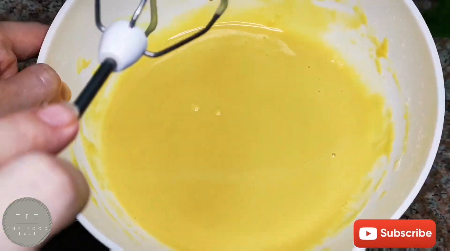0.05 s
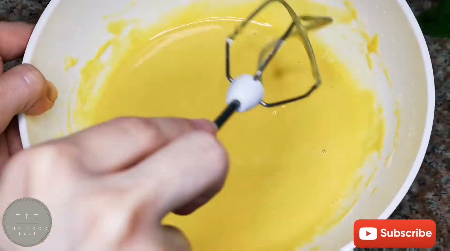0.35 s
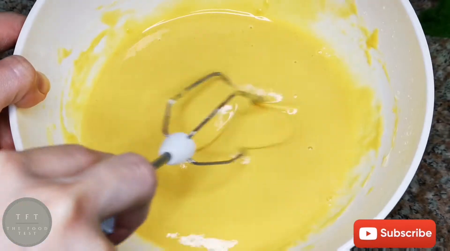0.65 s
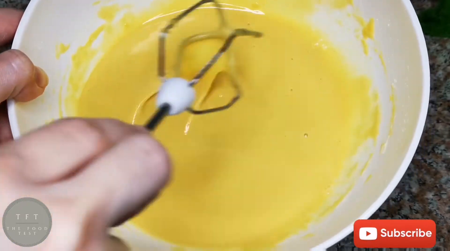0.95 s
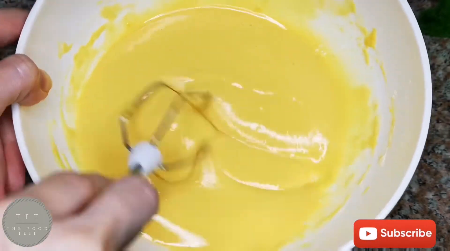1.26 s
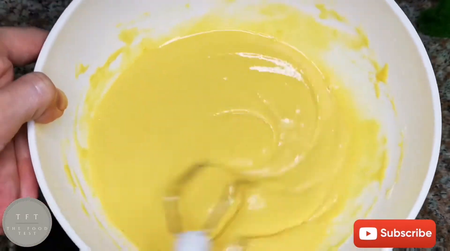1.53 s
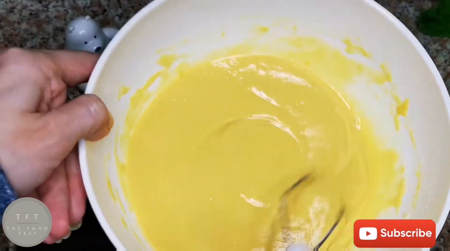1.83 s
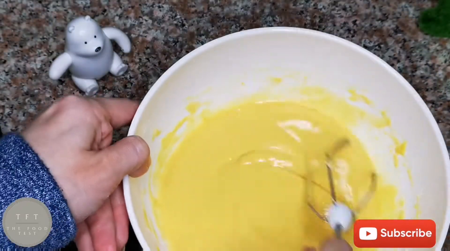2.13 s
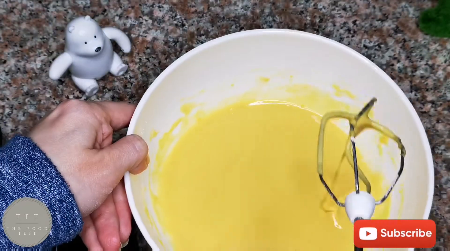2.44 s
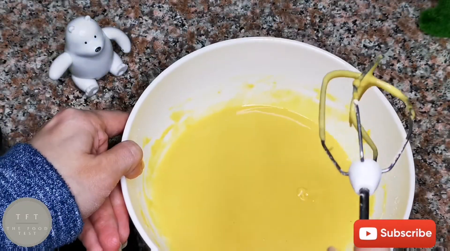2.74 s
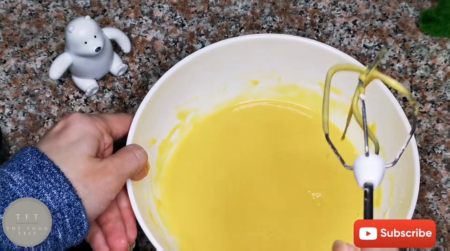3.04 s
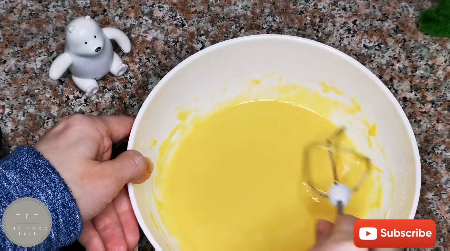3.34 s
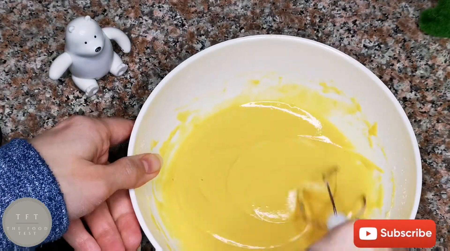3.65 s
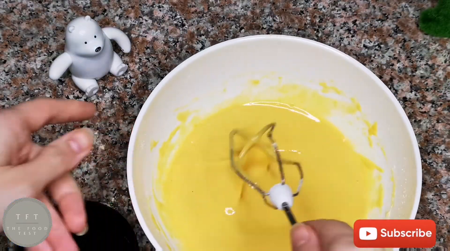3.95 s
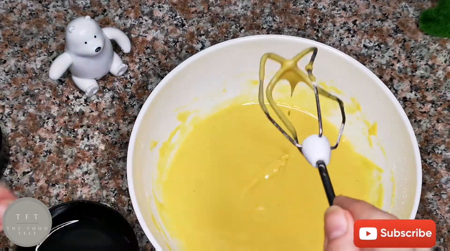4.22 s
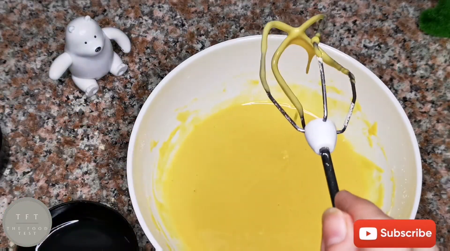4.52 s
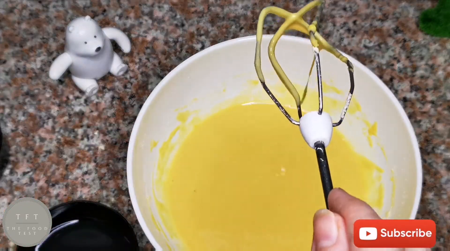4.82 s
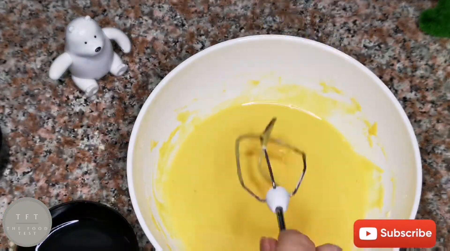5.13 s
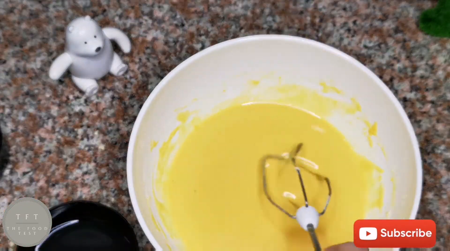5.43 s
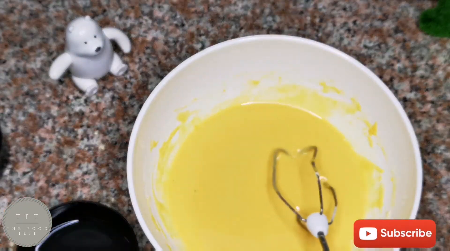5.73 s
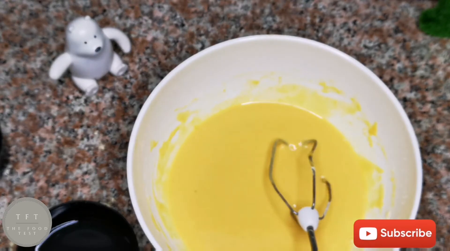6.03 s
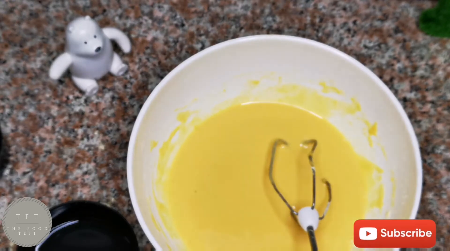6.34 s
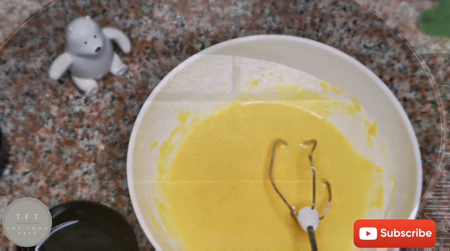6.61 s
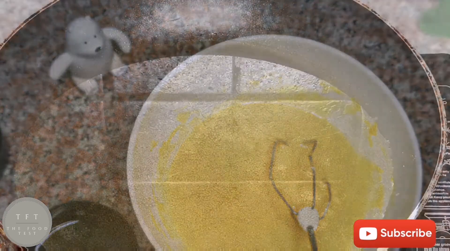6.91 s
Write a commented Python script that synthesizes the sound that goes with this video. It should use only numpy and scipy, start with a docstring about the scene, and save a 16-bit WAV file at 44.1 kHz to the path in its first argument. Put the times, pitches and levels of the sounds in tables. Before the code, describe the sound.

A wire whisk ticks and scrapes in a bowl of batter, with a clatter of dull knocks and two clinks over kitchen hum.

```python
"""Whisking batter in a ceramic bowl

A wire whisk stirs thick batter, close by in a small, humming kitchen. The batter is almost
silent: the wires tick and scrape on the bowl, a few dull knocks clatter, and the whisk clinks
twice as it is laid against the rim. Near the end all sound drops out briefly."""
import sys
import numpy as np
from scipy import signal
from scipy.fft import rfft, irfft, next_fast_len
from scipy.io import wavfile
from scipy.ndimage import uniform_filter1d

SR = 44100
rng = np.random.default_rng(int(sys.argv[2]) if len(sys.argv) > 2 else 0)


def dump_mix(stems):
    """Bounce the given channels to the path in sys.argv[1] as a 16-bit WAV at rate SR."""
    frames = np.atleast_2d(stems).T  # one column per channel
    limited = np.clip(frames, -1, 1)  # hard clip at full scale
    pcm = np.round(limited * 32767).astype(np.int16)
    wavfile.write(sys.argv[1], SR, pcm)


N = 311768
TIME_S = np.arange(N) / SR
AGE_S = TIME_S[:SR // 2]  # time since a blow
TOP_HZ = 15000


def undb(db):
    """Decibels to gain."""
    return 10 ** (np.asarray(db) / 20)


def unit(x):
    """Scale to rms 1."""
    return x / np.sqrt(np.mean(x ** 2))


def add(out, start_s, x):
    """Mix x into out."""
    i = int(start_s * SR)
    out[i:i + len(x)] += x[:N - i]


def colour(x, points):
    """Minimum-phase filter, unit power gain; points: freq_hz, gain_db."""
    size = 2 * next_fast_len(len(x))
    hz, db = np.transpose(points)
    bins_hz = np.fft.rfftfreq(size, 1 / SR)
    gain = unit(undb(np.interp(np.log(bins_hz + 1), np.log(hz), db)))
    cepstrum = irfft(np.log(gain))
    cepstrum[1:size // 2] *= 2
    cepstrum[size // 2 + 1:] = 0
    return irfft(rfft(x, size) * np.exp(rfft(cepstrum)))[:len(x)]


def band(hz, width_hz):
    """Noise passed twice through one resonance, rms 1."""
    b, a = signal.iirpeak(hz, hz / width_hz, fs=SR)
    return unit(signal.lfilter(b, a, signal.lfilter(b, a, rng.standard_normal(N))))


def fade(t60_s):
    """Free decay after a blow."""
    return np.exp(-np.log(1000) * AGE_S / t60_s)


def onset(rise_s):
    """Smooth rise from 0 to 1."""
    return 1 - np.exp(-(AGE_S / rise_s) ** 2)


def ring(modes):
    """Modes struck together: freq_hz, level_db, t60_s."""
    return sum(undb(db) * fade(t60_s) * np.sin(2 * np.pi * hz * AGE_S) for hz, db, t60_s in modes)


def swell(hz, rise_s):
    """Heavily damped resonance: builds for a few cycles, dies as fast."""
    u = AGE_S / rise_s
    return (u * np.exp(1 - u)) ** 6 * np.cos(2 * np.pi * hz * (AGE_S - rise_s))


def burst(points, t60_s, rise_s):
    """Crack of a contact that takes a moment to close; points: freq_hz, gain_db."""
    return colour(rng.standard_normal(len(AGE_S)) * fade(t60_s) * onset(rise_s), points)


def wander(rate_hz):
    """Random line, rate_hz new values a second."""
    return np.interp(AGE_S * rate_hz, np.arange(len(AGE_S)), rng.standard_normal(len(AGE_S)))


def kitchen(x, wet_db, t60_s, rise_s):
    """Direct sound plus dense reflections off tiles and cupboards."""
    spectrum = rfft(rng.standard_normal(len(AGE_S)))
    tail = irfft(spectrum / np.abs(spectrum), len(AGE_S)) * fade(t60_s) * onset(rise_s)
    return x + undb(wet_db) * signal.fftconvolve(x, tail / np.linalg.norm(tail))[:N]


def room_tone():
    """Ventilation rumble and faint whine at the room's resonances, a steady hum line near 959 Hz, plus thin
    hiss."""
    # air spectrum: freq_hz, density_db
    air_colour = [(20, -5), (60, -5.5), (140, -4.5), (185, -10), (260, -5.5), (410, -12), (510, -14.5),
                  (700, -14.5), (1100, -16.5), (1500, -21), (2900, -29), (4200, -43), (7500, -39.5),
                  (9400, -66.5), (15000, -72)]
    # rumble envelope: time_s, level_db
    air_levels = [(0, -57), (2.8, -56.5), (3.3, -54), (5.6, -55), (6.4, -52.5), (6.9, -56)]
    # room resonances and a hum line near 959 Hz: freq_hz, width_hz, level_db re air
    drone_lines = [(44.6, 14, -6), (70.6, 7.2, -8.5), (102.7, 12, -5), (139.9, 35, -11.5),
                   (212.8, 8.1, -12.5), (793.7, 27, -17.5), (959, 11, -18)]
    air = unit(colour(rng.standard_normal(N), air_colour))
    drone = sum(undb(db) * band(hz, width_hz) for hz, width_hz, db in drone_lines)
    hiss = colour(rng.standard_normal(N), [(3000, -6), (5500, -15.5), (6800, -9.5), (7800, 0),
                                           (8300, -15.5), (9500, -24), (15000, -37)])
    level_db = np.interp(TIME_S, *np.transpose(air_levels))
    return undb(level_db) * (air + drone) + undb(-77) * hiss


def ticks():
    """Wires touch the bowl, damped by batter: a crack, a brief ring, a soft thud."""
    # wire contacts: start_s, level_db, wire_hz, wire_db, thud_hz, thud_db, tilt_db_per_octave
    touches = [(.6324, -47, 2840, 3.5, 810, 0, -4), (.8355, -63, 9900, -10, 800, -12, 4),
               (1.2570, -29, 5850, -11, 578, -9.5, 3), (1.4310, -60, 2820, 8, 600, -6, 0),
               (1.5130, -57.5, 3920, 0, 600, -9, -3), (1.7135, -56.5, 2300, 4, 680, 6, -4),
               (2.0865, -54, 3880, -5, 824, 5, -3), (3.4730, -40, 5500, -1, 1028, 2.5, -1),
               (3.5308, -47.5, 5950, -1, 598, 0, -1), (3.5842, -49, 5570, 7, 600, -14, -1),
               (3.7730, -41, 8700, -0.5, 635, -7, -4.5), (3.9107, -43, 5680, -6, 610, -10, 2)]
    # contact spectrum: freq_hz, gain_db
    crack_colour = [(400, -10), (1500, -14.5), (2800, -10.5), (3500, -14), (4200, -5.5), (5000, -8.5),
                    (5650, 4), (6400, -6), (7700, 1.5), (8700, -3.5), (9400, -14), (11400, -20),
                    (12200, -35), (15000, -37)]
    wires, bowl = np.zeros(N), np.zeros(N)
    for start_s, db, wire_hz, wire_db, thud_hz, thud_db, tilt in touches:
        tilted = [(hz, gain_db + tilt * np.log2(hz / TOP_HZ)) for hz, gain_db in crack_colour]
        crack = burst(tilted, t60_s=.016, rise_s=.0012)
        wire = ring([(wire_hz, wire_db, .014)]) * (1 - fade(.0014))
        thud = ring([(thud_hz, 0, .04), (thud_hz * 1.183, -6, .03)]) * (1 - fade(.0037))
        add(wires, start_s, undb(db) * (crack + wire))
        add(bowl, start_s, undb(db + thud_db) * thud)
    return (kitchen(wires, wet_db=-5.5, t60_s=.23, rise_s=.0032)
            + kitchen(bowl, wet_db=.5, t60_s=.2, rise_s=.0044))


def squelches(bubbles=7, spread_s=.033):
    """Batter sucks shut behind the wires: clusters of tiny bubbles that glide upward."""
    # air pockets: start_s, level_db, cavity_hz
    pockets = [(.812, -68, 2770), (1.405, -68, 3600), (1.420, -64.5, 2700), (1.490, -66.5, 3750),
               (1.785, -74, 4200), (3.774, -62.5, 4120)]
    glide_s = AGE_S + .057 * AGE_S ** 2 / (AGE_S + .0089)  # pitch rises toward +5.7 %
    out = np.zeros(N)
    for start_s, db, cavity_hz in pockets:
        for late, detune, size in rng.random((bubbles, 3)):
            hz = cavity_hz * (1 + .11 * (detune - .5))
            bubble = fade(.022) * np.sin(2 * np.pi * hz * glide_s)
            add(out, start_s + spread_s * late, undb(db + 5.4 * size) * bubble)
    return kitchen(out, wet_db=-6, t60_s=.16, rise_s=.0076)


def stroke(peak_s, build_s, release_s=.08, range_db=20):
    """Gain of one stroke: drag gains range_db over the build-up, loses it over the release."""
    return undb(-range_db * np.maximum((peak_s - TIME_S) / build_s, (TIME_S - peak_s) / release_s))


def stirring(cling_points=400, slips_per_s=3000):
    """Wire slips and wet crackles bunch as the batter clings; stick-slip on the glaze squeaks."""
    # whisk strokes: peak_s, level_db, build_s, squeak_db
    strokes = [(.85, -87, .3, -20), (1.43, -80, .25, -20), (1.70, -75, .09, -20), (1.81, -81, .1, -20),
               (1.97, -79, .3, -20), (3.588, -66, 0.07, 2.5), (3.91, -69, 0.24, -11)]
    cling_times_s = np.linspace(0, TIME_S[-1], cling_points)
    cling_db = 3 * np.interp(TIME_S, cling_times_s, rng.standard_normal(cling_points))
    slips = (rng.random(N) < slips_per_s / SR) * rng.standard_normal(N)
    slips *= undb(1.3 * rng.exponential(size=N) + cling_db)
    rasp = unit(colour(slips, [(500, -7), (2000, 6), (3800, 6), (4700, -10), (5700, 0), (8000, 3),
                               (9800, -6), (11500, -14), (12300, -19), (15000, -18)]))
    squeak = band(hz=5800, width_hz=660) * undb(cling_db)
    drag = sum(undb(db) * stroke(peak_s, build_s) * (rasp + undb(squeak_db) * squeak)
               for peak_s, db, build_s, squeak_db in strokes)
    return kitchen(drag, wet_db=-10, t60_s=.21, rise_s=.007)


def knocks(hard_blow_db=-15.5):
    """Dull knocks: a snap that grows with force, a hollow thump, body ring, slight counter boom."""
    # blows and bounces: start_s, level_db, ring_db
    blows = [(2.9020, -15.5, -15), (2.9895, -21.5, -15.5), (3.0272, -26.5, -15), (3.0402, -39, -23),
             (3.0505, -38, -4.5), (3.1150, -49.5, -16), (3.2280, -28.5, -8.5), (3.2322, -35.5, -12.5)]
    # modes of the knocked body: freq_hz, level_db, t60_s
    body_modes = [(385, -14, .22), (438, -5, .26), (635, 3, .24), (662, -5, .22), (719, -1, .26),
                  (767, -2, .24), (879, -4, .22), (952, -4, .2), (1031, -8, .17), (1141, -1, .17),
                  (1217, -6, .15), (1421, -13, .18), (1577, -14, .2), (1760, -19, .15), (2310, -20, .08)]
    body = ring(body_modes) * (1 - fade(.06))
    thump = (swell(1120, rise_s=.002795) + undb(-4) * swell(690, rise_s=.00289)
             + undb(-19) * swell(1570, rise_s=.00202))
    boom = ring([(120, -29.5, .26), (165, -33.5, .15)])
    to_room, direct = np.zeros(N), np.zeros(N)
    for start_s, db, ring_db in blows:
        snap_db = -11.5 + .94 * (db - hard_blow_db)
        snap = burst([(300, -3), (1400, -.5), (2300, -2), (3100, -13.5), (4000, -13), (6500, -20.5),
                      (11000, -47.5), (15000, -60)], t60_s=.017, rise_s=.00024)
        edge = burst([(2500, -29.5), (4000, -3.5), (5300, -2), (6200, 8), (7500, -16), (11000, -30),
                      (15000, -46)], t60_s=.0034, rise_s=.0002)
        add(to_room, start_s, undb(db) * (thump + undb(snap_db) * snap + boom))
        add(to_room, start_s + .0042, undb(db - 11.5) * thump)  # echo off the nearby wall
        add(direct, start_s, undb(db + snap_db - 7) * edge)
        add(direct, start_s + .00197, undb(db + ring_db - .5) * body)
    return kitchen(to_room, wet_db=-3.5, t60_s=.25, rise_s=.004) + direct


def clinks(flutter_db=3.5):
    """Steel on the bare rim rings in close, beating modes; each mode's level flutters quickly."""
    # whisk on rim: start_s, level_db, thud_db, contact_db, tilt_db_per_octave
    hits = [(5.7560, -30.5, -12.5, -0.5, 0), (5.764, -58, -18, -8, 6), (6.1777, -50.5, 4, -3.5, -1)]
    # free modes of bowl and whisk: freq_hz, level_db, t60_s
    free_modes = [(2471, -9, .26), (2529, -8, .22), (2805, -14, .22), (3488, -12, .2), (3883, -5, .22),
                  (3929, -7, .22), (3977, -6, .24), (4140, -17, .24), (5396, -7, .24), (5443, -6, .24),
                  (7079, -6, .24), (7119, -2, .28), (7186, -5, .16), (7375, -18, .26), (7660, -19, .18),
                  (8963, -19, .28), (11080, -24, .25), (13340, -36, .2), (14870, -42, .22)]
    thud = ring([(486, -5.5, .3), (583, 3, .28), (652, .5, .2), (818, -8.5, .16), (1385, -9, .13)])
    rim, contact = np.zeros(N), np.zeros(N)
    for start_s, db, thud_db, contact_db, tilt in hits:
        modes = [ring([(hz, mode_db + tilt * np.log2(hz / 4000), t60_s)])
                 for hz, mode_db, t60_s in free_modes]
        # flutter as with nearby reflections
        chime = sum(mode * undb(flutter_db * wander(rate_hz=90)) for mode in modes)
        crack = burst([(400, -9), (1600, -15), (2600, 3.5), (3300, -2), (4000, 13.5), (4700, -3.5),
                       (6300, -13.5), (7200, 9.5), (8300, -15), (9700, -23.5), (11500, -16.5),
                       (12400, -37), (15000, -32)], t60_s=.062, rise_s=.0013)
        add(rim, start_s, undb(db - 3) * (chime + undb(thud_db) * thud) * (1 - fade(.0055)))
        add(contact, start_s, undb(db + contact_db) * crack)
    return (kitchen(rim, wet_db=-6.5, t60_s=.24, rise_s=.0064)
            + kitchen(contact, wet_db=2.5, t60_s=.29, rise_s=.0028))


def scene():
    """All sources, mono."""
    return (room_tone() + ticks() + squelches() + stirring() + knocks() + clinks())[None]


def record(dry):
    """Brief dropout, then a steep low-pass."""
    mute_from_s, mute_to_s = 6.492, 6.856
    live = (TIME_S < mute_from_s) | (TIME_S > mute_to_s)
    gate = uniform_filter1d(live * 1., size=128)
    lowpass = signal.ellip(8, .2, 70, TOP_HZ, fs=SR, output="sos")
    return signal.sosfilt(lowpass, dry * gate)


dry = scene()
out = record(dry)
dump_mix(out)
```